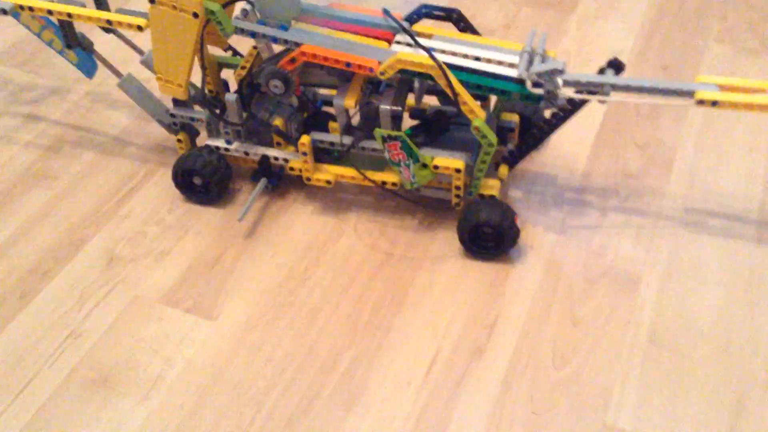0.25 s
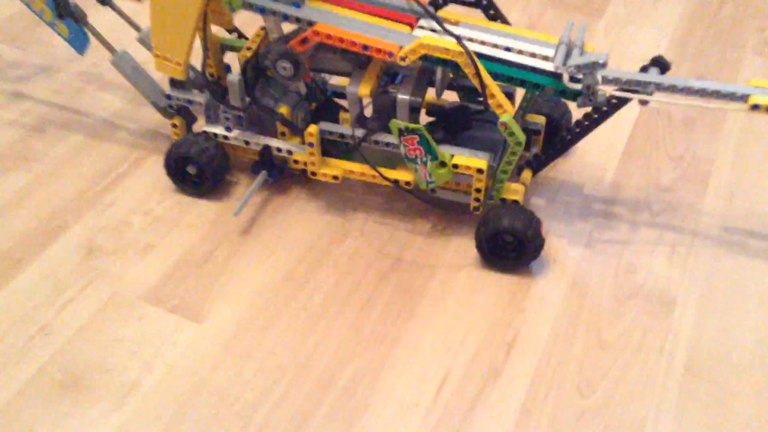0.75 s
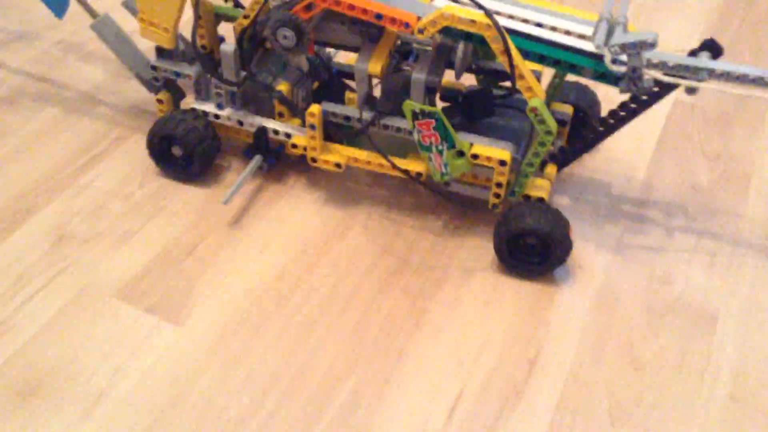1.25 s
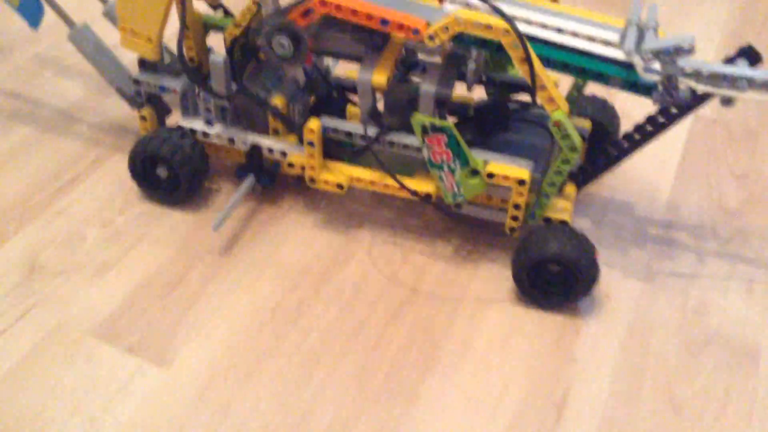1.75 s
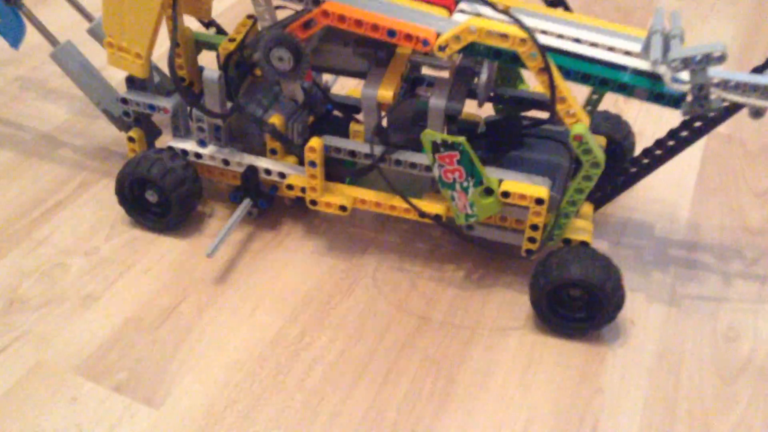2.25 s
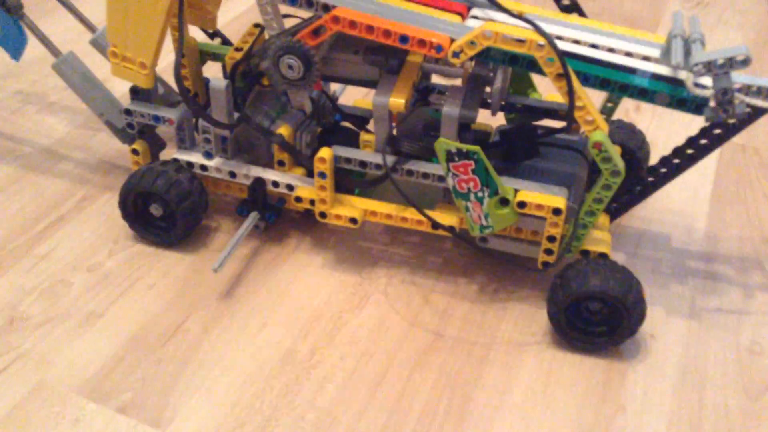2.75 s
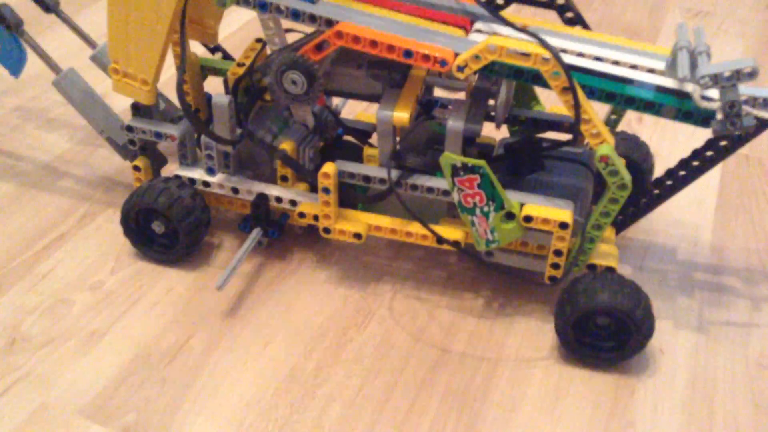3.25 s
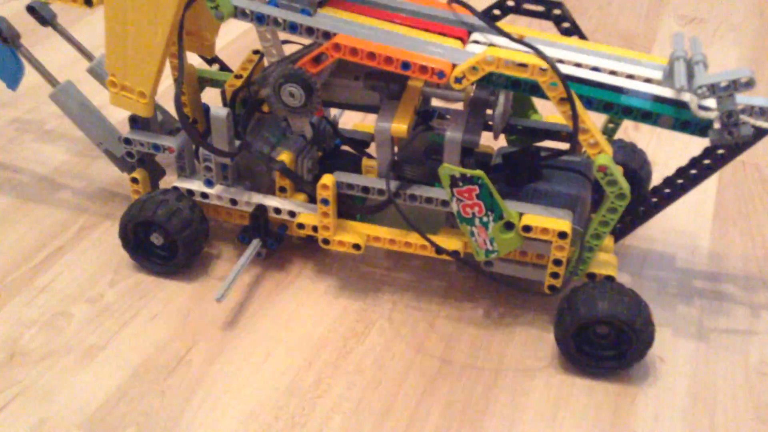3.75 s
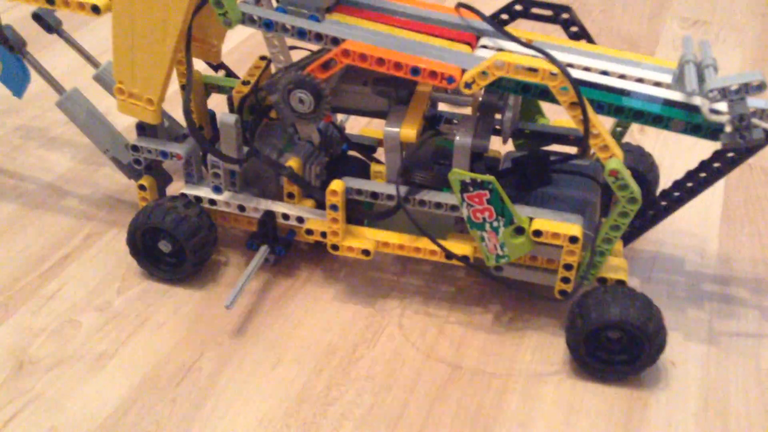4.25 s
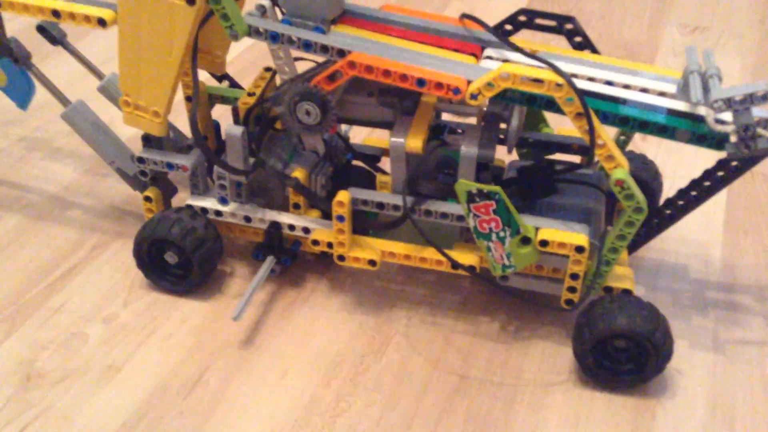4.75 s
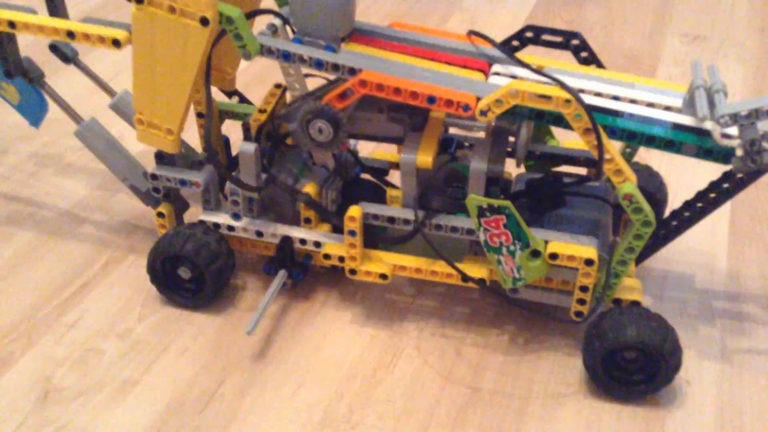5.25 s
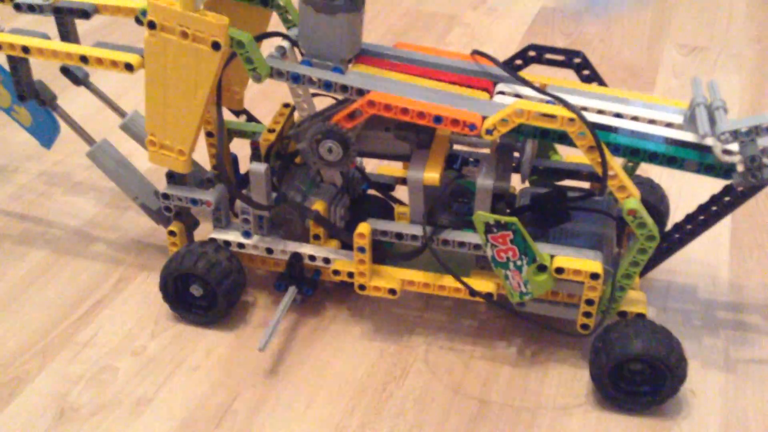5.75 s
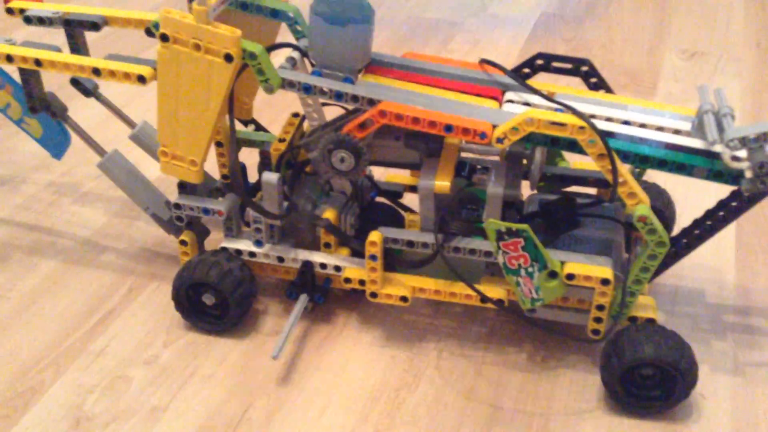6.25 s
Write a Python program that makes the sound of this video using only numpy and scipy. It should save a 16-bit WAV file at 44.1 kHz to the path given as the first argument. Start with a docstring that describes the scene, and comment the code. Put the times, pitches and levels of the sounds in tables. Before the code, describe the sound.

Close, thin-sounding small microphone in a room: a toy gear drive chatters without pause, hard plastic teeth snapping in a fast, slightly uneven rattle with a repeating six-beat pattern. Behind it lie steady treble hiss, wavering whine and low faint rumble. It recedes at first, comes nearer from under one second to three, with two dull floor bumps midway, then stays close and harsh until it cuts off.

```python
"""A motorised toy machine of plastic beams and gears runs on a wooden floor, heard from close by.
From the start, a six-toothed drive part skips about thirty times a second: each tooth snaps into the frame.
Behind it fast gears hiss and whistle, and motors whine, ring in their cases and rumble through the floor.
The microphone draws back until about 0.7 s, then moves in; two soft knocks come through the floor
at about 1.4 and 1.5 s. From about 3 s on the microphone stays close."""
import sys
import numpy as np
from scipy import signal
from scipy.fft import rfft, irfft
from scipy.io import wavfile

SR = 44100
rng = np.random.default_rng(int(sys.argv[2]) if len(sys.argv) > 2 else 0)


def unload_audio(sound):
    """Save the sound as a 16-bit wav file, at the path given as the first command line argument."""
    columns = np.transpose(np.atleast_2d(sound))
    # keep every value between -1 and 1, then stretch to whole-number steps
    steps = np.round(np.clip(columns, -1, 1) * 32767)
    wavfile.write(sys.argv[1], SR, steps.astype(np.int16))


N = 287091
TIME = np.arange(N) / SR


def from_db(db):
    """Turn decibels into a gain."""
    return 10 ** (np.asarray(db) / 20)


def rms_one(x):
    """Scale a sound to an average (rms) strength of one."""
    return x / np.sqrt(np.mean(x ** 2) + 1e-20)


def at_hz(points, hz):
    """Read a table between its points, with pitch on a logarithmic axis."""
    f, value = np.transpose(points)
    return np.interp(np.log(hz + 1), np.log(f), value)


def coloured(x, spectrum, size=2048):
    """Shape a sound by a spectrum; the filter answers as early as it can and has unit energy."""
    gain = from_db(at_hz(spectrum, np.fft.rfftfreq(size, 1 / SR)))
    # folding the cepstrum moves the filter's whole response after the click
    cepstrum = irfft(np.log(gain))
    cepstrum[1:size // 2] *= 2
    cepstrum[size // 2 + 1:] = 0
    response = irfft(np.exp(rfft(cepstrum)))
    return signal.fftconvolve(x, response / np.linalg.norm(response))[:N]


def ring(x, hz, t60):
    """A click sets a wave ringing at about its own height; it fades by 60 dB in t60 seconds."""
    radius = np.exp(-np.log(1000) / (t60 * SR))
    turn = 2 * np.pi * hz / SR
    # far too faint to hear: keeps the filter from slowing down on vanishing numbers
    trickle = 1e-18 * (-1) ** (np.arange(N) // 2)
    return signal.lfilter([.5, 0, -.5], [1, -2 * radius * np.cos(turn), radius * radius], x + trickle)


def clicks(times, sizes):
    """Single-sample clicks at the given times."""
    at = np.round(np.ravel(times) * SR).astype(int)
    inside = (at >= 0) & (at < N)
    return np.bincount(at[inside], np.ravel(sizes)[inside], N)


def drift(hz):
    """Random wandering, mostly slower than hz, with an rms of one."""
    low_pass = signal.butter(2, hz, fs=SR, output="sos")
    return rms_one(signal.sosfilt(low_pass, rng.standard_normal(N)))


def tooth_times(first_s=.0111, teeth_per_s=29.5118, speed_up_per_s2=.01133):
    """One skip whenever the slowly quickening drive has advanced by a tooth."""
    advance = teeth_per_s * TIME + speed_up_per_s2 * TIME ** 2 / 2
    return first_s + np.interp(np.arange(int(advance[-1]) + 1), advance, TIME)


def chatter(blows, length_s):
    """Each blow chatters at random for a moment, dying away as the contact settles."""
    hold = np.cos(np.pi / 2 * np.minimum(TIME[:SR // 100] / length_s, 1)) ** 2
    energy = np.convolve(blows ** 2, hold / hold.sum())[:N]
    return np.sqrt(energy) * rng.choice([-1, 1], N)


def scatter(blows, t60):
    """Each blow breaks up into dying noise of the same energy."""
    keep = np.exp(-2 * np.log(1000) / (t60 * SR))
    energy = signal.lfilter([1 - keep], [1, -keep], blows ** 2 + 1e-18)
    return np.sqrt(energy) * rng.standard_normal(N)


# the six teeth of one turn, levels relative:
# (slip level [dB], landing level [dB], landing delay [s], ring of the housing [dB])
DRIVE_TEETH = [(-15, 3.5, .0007, 2), (-2, -18, 0.00067, -2), (-5.5, .5, .0009, 1.5),
               (-2.5, 3.5, 0.00077, -3.5), (-4.5, -1.5, 0.0013, -3), (1, -6.5, .0006, -5)]
# how the plastic frame answers a snap: (frequency [Hz], relative level [dB])
FRAME_SPECTRUM = [(100, -60), (400, -37), (1000, -29.5), (2000, -18), (3500, -15), (4500, -5), (5700, -9.5),
                  (6700, -3), (7900, 2.5), (9000, -1.5), (10200, -5), (12000, -10), (13800, -20),
                  (15500, -24)]
# ringing notes of the gear housing: (frequency [Hz], relative level [dB], time to fade by 60 dB [s])
HOUSING_MODES = [(1893, -40, 0.011), (2896, -32, 0.025), (3082, -28, 0.019), (4140, -25.5, 0.008),
                 (4550, -23.5, 0.0088), (4930, -22, 0.0083), (7820, -21, 0.01), (8620, -20, 0.013),
                 (10240, -31, .008), (11020, -32.5, .008)]
# the snap spreading through beams and room: (frequency [Hz], relative level [dB])
TAIL_SPECTRUM = [(150, -26), (600, -16), (1400, -9.5), (2000, -4), (3000, -3.5), (4400, 7.5), (5800, 6.5),
                 (8000, 1.5), (10500, 4.5), (14000, -19)]


def skipping_drive(tooth_db=-3.0, uneven_db=1.0, jitter_s=.00012, direct_db=-9.5, chatter_db=3., chatter_s=0.0023,
                   rebound_db=-11.0, push_delay_s=.0003, colour_db=3.0, tail_db=0.5, tail_t60=0.048, focus=0.25):
    """Each tooth slips off, lands about a millisecond later, rebounds and sets the beams rattling."""
    start = tooth_times()
    count = len(start)
    slip_db, land_db, delay, housing_db = np.array(DRIVE_TEETH)[np.arange(count) % len(DRIVE_TEETH)].T
    # each tooth catches a little harder or lighter, earlier or later, by chance
    force_db = uneven_db * rng.standard_normal(count)
    start = start + jitter_s * rng.standard_normal(count)

    slips = clicks(start, from_db(force_db + slip_db))
    landings = clicks(start + delay, from_db(force_db + land_db))
    rebound_sizes = from_db(force_db + rebound_db) * rng.rayleigh(size=count)
    rebounds = clicks(start + rng.uniform(.002, .01, count), rebound_sizes)
    blows = from_db(tooth_db) * (slips - landings + rebounds)

    rattle = from_db(chatter_db) * chatter(blows, chatter_s)
    frame = coloured(from_db(direct_db) * blows + rattle, FRAME_SPECTRUM)
    # each snap excites the housing notes in its own random mix
    housing = 0
    for hz, db, t60 in HOUSING_MODES:
        push = from_db(db + housing_db + force_db + colour_db * rng.standard_normal(count))
        signed_push = push * rng.choice([-1, 1], count)
        housing = housing + ring(clicks(start + push_delay_s, signed_push), hz, t60)
    tail = from_db(tail_db) * coloured(scatter(blows, tail_t60), TAIL_SPECTRUM)
    # from further off the sharp front of each snap weakens more than its tail
    near_db = np.interp(TIME, *np.transpose(NEARNESS_AND_TREBLE)[:2])
    return from_db(focus * near_db) * (frame + housing) + tail


# colour of the gear hiss: (frequency [Hz], relative level [dB])
HISS_SPECTRUM = [(400, -40.5), (1000, -25), (2400, -21), (3400, -14), (4300, -11.5), (5700, -9),
                 (6600, -2.5), (7200, -3), (7900, 0.5), (9000, -.5), (10200, -4), (12000, -9),
                 (13800, -16.5), (15400, -18)]


def gears(hiss_db=-24.0, contacts_per_s=6000, spread_db=2.5, smooth_db=1.5, mesh_hz=633.0, mesh_depth=0.071,
          flutter_db=1.12, flutter_hz=26.):
    """Thousands of tiny tooth contacts over smooth rubbing pulse with the mesh and flutter at random."""
    touching = rng.random(N) < contacts_per_s / SR
    contact_sizes = from_db(spread_db * rng.standard_normal(N))
    contacts = touching * rng.choice([-1, 1], N) * contact_sizes
    friction = rms_one(contacts) + from_db(smooth_db) * rng.standard_normal(N)
    mesh = 1 + mesh_depth * np.sin(2 * np.pi * mesh_hz * TIME)
    hiss = rms_one(coloured(friction * mesh, HISS_SPECTRUM))
    return from_db(hiss_db + flutter_db * drift(flutter_hz)) * hiss


def gear_whistle(whistle_hz=2668., whistle_db=-53.0, waver=.016, waver_hz=15.):
    """One fast gear sings a thin note that wavers at random."""
    angle = 2 * np.pi * np.cumsum(whistle_hz * (1 + waver * drift(waver_hz))) / SR
    return from_db(whistle_db) * np.sqrt(2) * np.sin(angle)


# whine of the motor: (multiple of its turning rate [-], rms level before the microphone [dB])
MOTOR_WHINE = [(3, -70.5), (5, -73), (6, -65)]
# ringing of the motor cases: (frequency [Hz], width [Hz], rms level before the microphone [dB])
CASE_WHIR = [(1767, 81, -57), (2098, 34, -54.5), (2673, 77, -51), (2890, 110, -52)]
# motor rumble carried by the floor: (frequency [Hz], relative level [dB])
RUMBLE_SPECTRUM = [(60, -15), (110, -6.5), (180, 2), (250, -0.5), (330, 3), (480, -2.5), (800, -1.5),
                   (1500, -12.5), (4000, -36)]


def motors(motor_hz=236, rumble_db=-59.5, waver=0.0064, waver_hz=13.0):
    """The motor whines at a wavering speed, brush friction sings in its case, the floor carries its rumble."""
    angle = 2 * np.pi * np.cumsum(motor_hz * (1 + waver * drift(waver_hz))) / SR
    whine = sum(from_db(db) * np.sqrt(2) * np.sin(multiple * angle) for multiple, db in MOTOR_WHINE)
    whir = 0
    for hz, width, db in CASE_WHIR:
        # a narrower resonance rings longer
        t60 = np.log(1000) / (np.pi * width)
        whir = whir + from_db(db) * rms_one(ring(rng.standard_normal(N), hz, t60))
    rumble = from_db(rumble_db) * rms_one(coloured(rng.standard_normal(N), RUMBLE_SPECTRUM))
    return whine + whir + rumble


# nearness and treble shadow of the microphone, and the level of the top octave:
# (time [s], nearness [dB], shadow of the upper treble [dB], top octave [dB])
NEARNESS_AND_TREBLE = [(0, -4.5, 0, 12), (.15, -4, -11, 4), (.68, -8.5, -19.5, 15.5),
                       (1.1, -5.5, -15.5, 9.5), (1.7, -1.5, -6, 5.5), (2.5, -.8, -1, 5), (3.2, .3, -1, 2.5),
                       (4.4, .5, 0, -.5), (6.5, .5, 1, -3)]
# how much of each of those three a frequency gets: (frequency [Hz], share [0-1])
NEARNESS_SHARE = [(300, 0.3), (1200, 0.38), (2800, 0.4), (4500, 0.88), (16000, 1)]
TREBLE_SHADOW_SHARE = [(7000, 0.012), (8000, 0.51), (8900, 0.89), (10000, 0.49), (11300, 0.52),
                       (13000, 0.088)]
TOP_OCTAVE_SHARE = [(10000, 0.091), (11700, 0.85), (13000, 0.5), (14000, 0.99), (15200, 1)]


def moving_microphone(x, size=256):
    """Nearness and shadow act mostly on the direct treble, less on the roomy bass; the top octave also shifts."""
    hz, s, frames = signal.stft(x, SR, nperseg=size)
    when, *controls = np.transpose(NEARNESS_AND_TREBLE)
    shares = (NEARNESS_SHARE, TREBLE_SHADOW_SHARE, TOP_OCTAVE_SHARE)
    gain_db = sum(np.outer(at_hz(share, hz), np.interp(s, when, control))
                  for share, control in zip(shares, controls))
    return signal.istft(frames * from_db(gain_db), SR, nperseg=size)[1][:N]


# soft knocks through the floor, before the bass cut: (time [s], level [dB])
FLOOR_KNOCKS = [(1.409, -39.5), (1.518, -45)]


def bumps(floor_hz=202.0, floor_t60=0.037):
    """Each knock sets the floor ringing dully for a few cycles."""
    s, db = np.transpose(FLOOR_KNOCKS)
    return ring(clicks(s, from_db(db)), floor_hz, floor_t60)


def scene():
    """The whole machine at one microphone, alike in both channels."""
    machine = skipping_drive() + gears() + gear_whistle() + motors()
    sound = moving_microphone(machine) + bumps()
    return np.array([sound, sound])


def record(dry, bass_cut_hz=176.0, top=0.64, cutoff_hz=15430):
    """The small microphone loses the bass, the tallest peaks overload the input, then the top is cut."""
    bass_cut = signal.butter(2, bass_cut_hz, "high", fs=SR, output="sos")
    thin = signal.sosfilt(bass_cut, dry)
    low_pass = signal.firwin(301, cutoff_hz, fs=SR, window="blackman")
    return signal.fftconvolve(np.clip(thin, -top, top), low_pass[None], mode="same", axes=1)


dry = scene()
out = record(dry)
unload_audio(out)
```